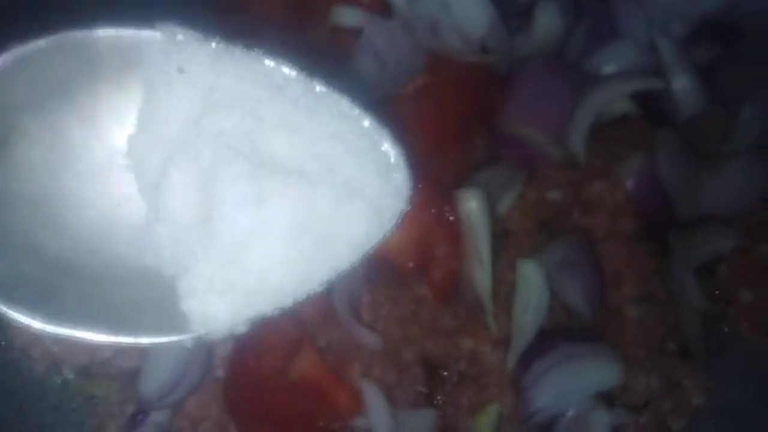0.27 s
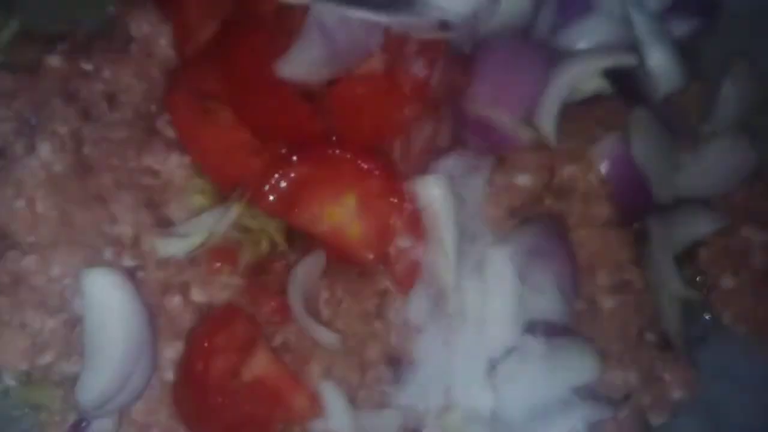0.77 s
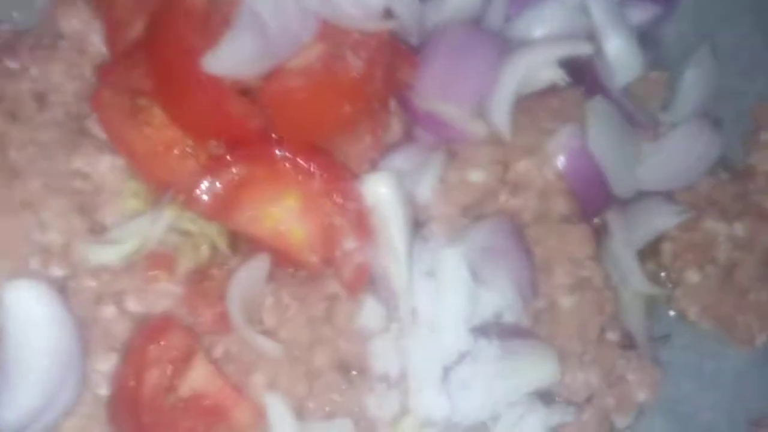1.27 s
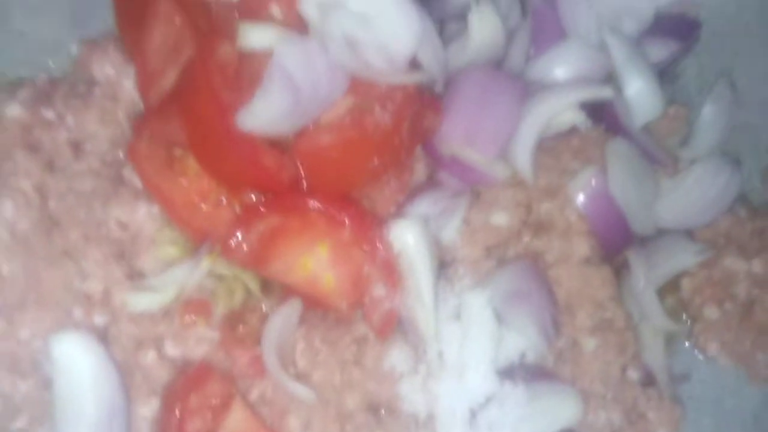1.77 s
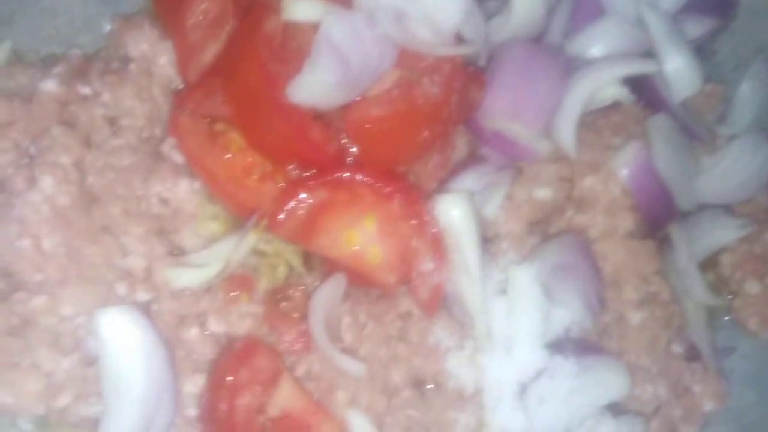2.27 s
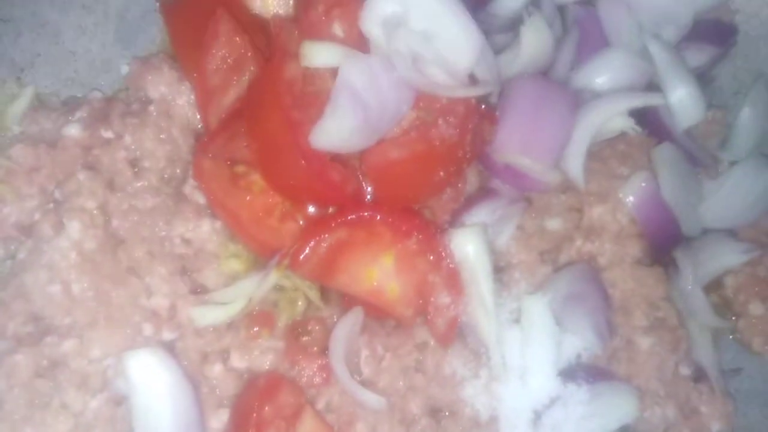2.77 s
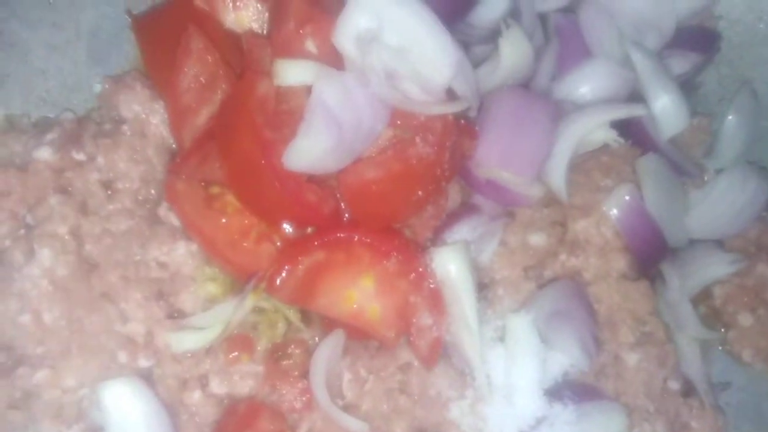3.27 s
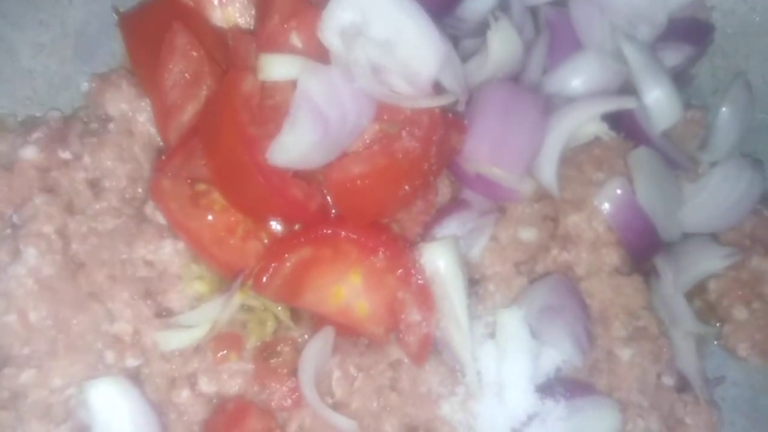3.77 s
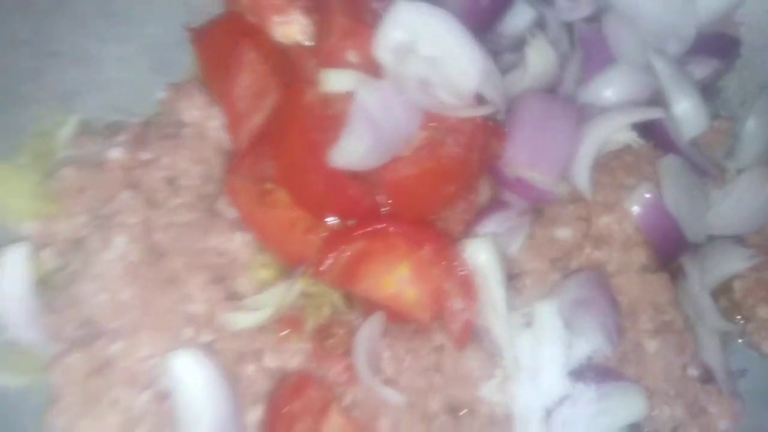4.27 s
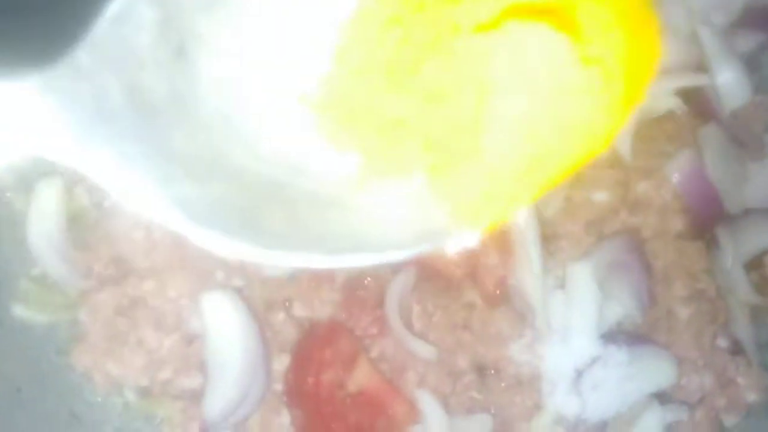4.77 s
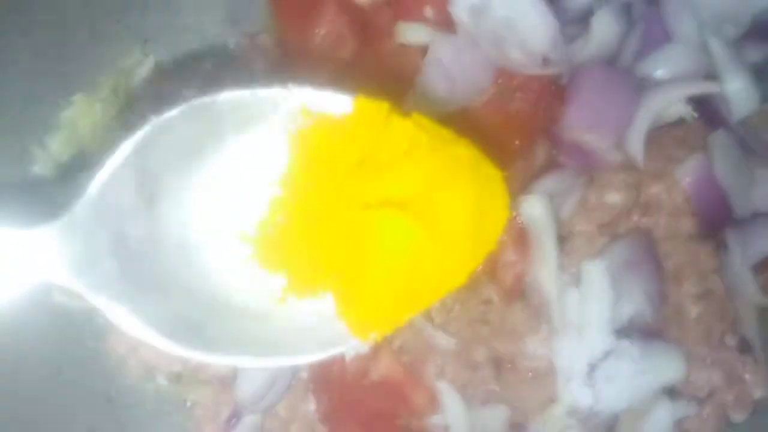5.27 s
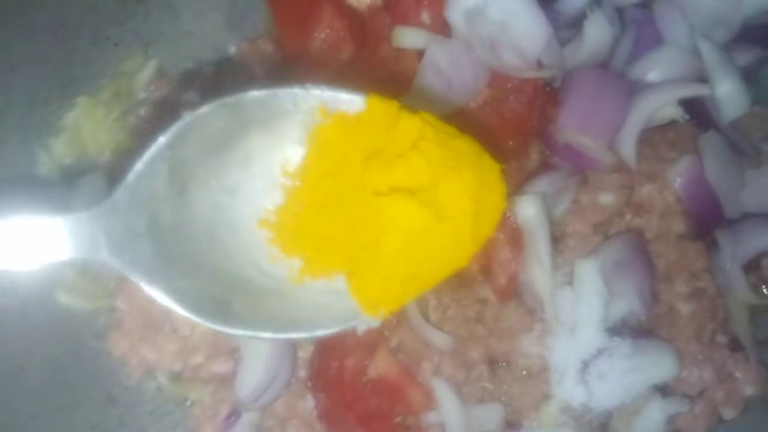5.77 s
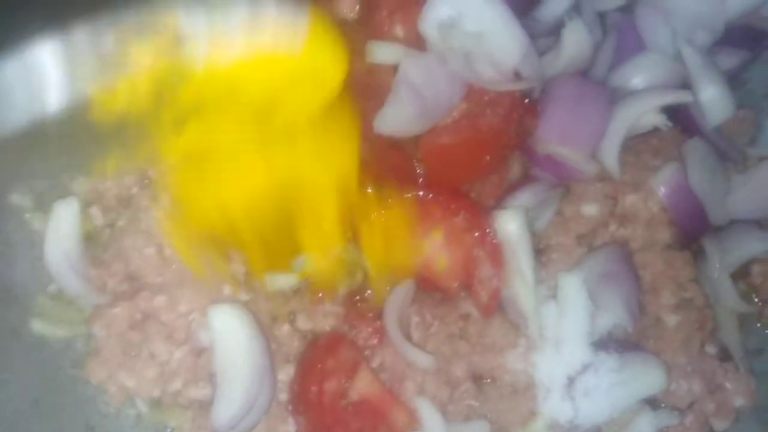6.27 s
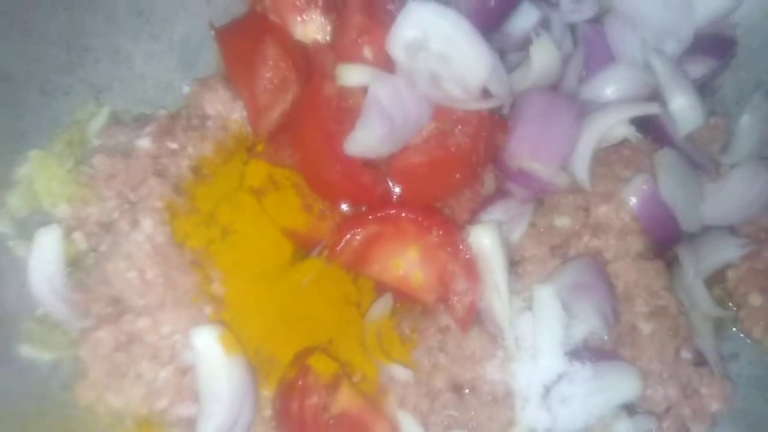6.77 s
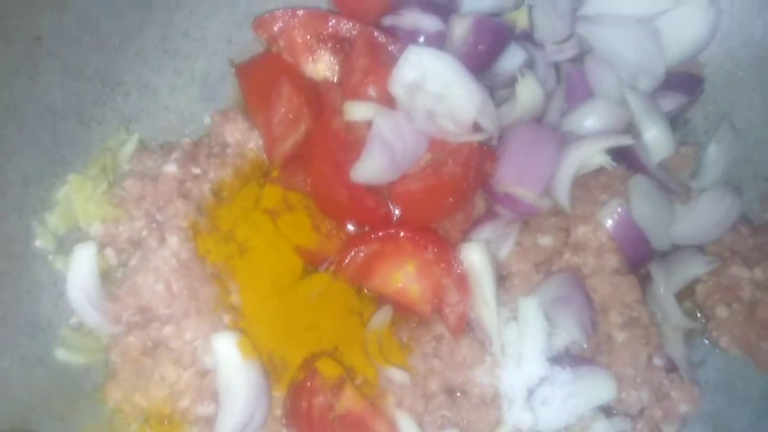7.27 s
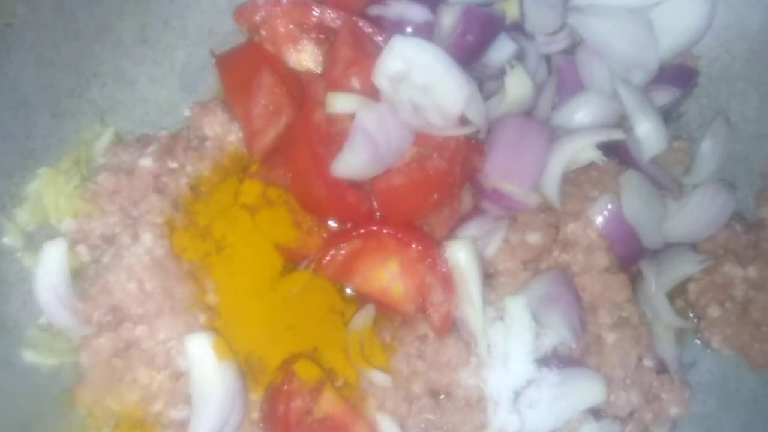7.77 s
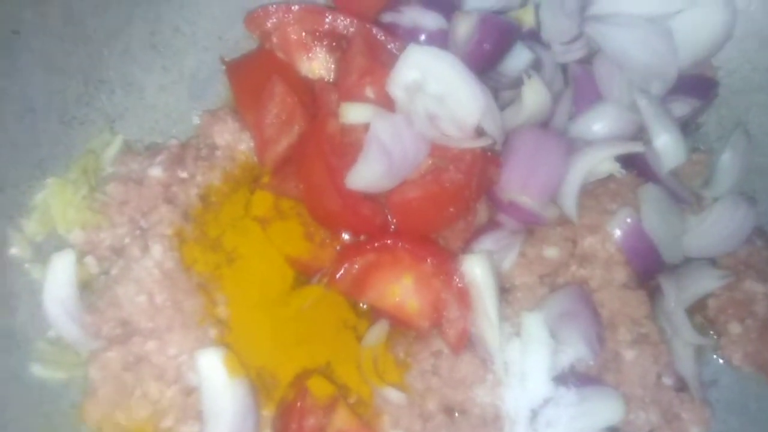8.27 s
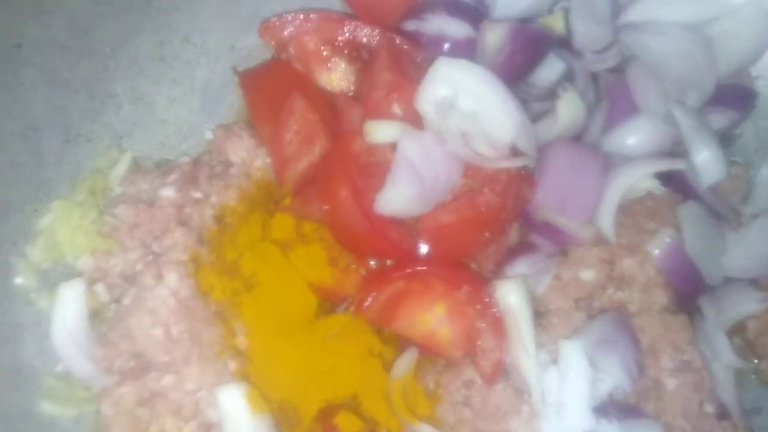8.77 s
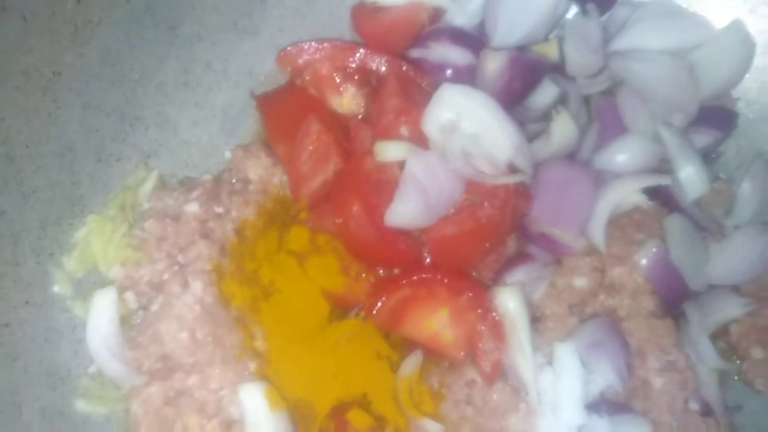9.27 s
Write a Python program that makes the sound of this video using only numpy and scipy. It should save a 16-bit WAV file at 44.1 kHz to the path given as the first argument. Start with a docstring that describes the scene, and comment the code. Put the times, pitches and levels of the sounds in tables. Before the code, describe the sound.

A metal spoon strikes a pot rim: two hard, clattering raps early, then, after scraping through powder in a small container, a slower series of five raps and a barely audible last touch. Each cracks sharply and rings for a fraction of a second. The close stereo microphones lean left and the right is duller. Soft handling rubs, a soft late thump and a thin pulsing whine fill the quiet kitchen.

```python
"""Spoon, salt and cooking pot

A steel spoon tips salt and is knocked on a metal pot's rim, close by in a small kitchen: modes, noise wash and cracks.
Between the two groups of knocks it clinks and scrapes in a hollow container: random slips through resonators.
Shaped noise makes the salt, rubs, jostles and swishes; a filtered pulse late on bumps the left microphone.
Room noise lies on both sides throughout; wavering hiss and a faint throbbing high whine lie mostly on the left.
"""
import sys
import numpy as np
from scipy import signal
from scipy.fft import rfft, irfft
from scipy.io import wavfile

SR = 44100
rng = np.random.default_rng(int(sys.argv[2]) if len(sys.argv) > 2 else 0)


def store_pcm(level_fs):
    """Save levels as 16-bit WAV."""
    pcm = np.round(np.clip(level_fs, -1, 1) * 32767).astype(np.int16)
    wavfile.write(sys.argv[1], SR, np.atleast_2d(pcm).T)


N = 418950
TIME_S = np.arange(N) / SR

# Band widths are standard deviations unless marked -3 dB. Levels come before any echo.
# room noise: f/Hz, relative density/dB
ROOM = [(25, -28), (55, -6), (100, -5), (140, -5.5), (200, -8.5), (280, -6.5), (450, -10), (650, -19),
        (1100, -14), (2000, -24), (3200, -20), (5500, -35.5), (9000, -39), (14000, -38)]
# faint low room drone: f/Hz, width/Hz, rms level/dB
DRONE = [(96, 3, -72.5), (131, 3, -77)]
# hiss bands: f/Hz, width/Hz, rms level before waver/dB
HISS = [(1684, 79, -76), (2206, 79, -65.5), (2542, 51, -65), (2733, 120, -59.5), (2970, 83, -57.5),
        (3298, 71, -57.5), (3890, 110, -70), (4397, 160, -73), (5050, 99, -74), (5296, 140, -75.5),
        (6074, 70, -73.5), (10976, 230, -72)]
# whine bands: f/Hz, width/Hz, rms level before throb/dB
WHINE = [(6810, 18, -61), (6955, 39, -59), (7120, 13, -56.5), (7220, 16, -64.5), (7085, 175, -56)]
THROB_HZ = 10.095

# soft handling rubs: t/s, standard deviation/s, f/Hz, level at the swell's top/dB
RUBS = [(0.142, 0.055, 396, -51), (0.61, 0.033, 335, -61.5), (1.228, 0.081, 265, -50.5),
        (2.986, 0.053, 3500, -51.5), (4.42, 0.062, 292, -63.5), (5.597, 0.062, 1320, -61),
        (5.84, 0.055, 3100, -45.5)]
RUB_WIDTH_RATIO = 0.054  # band width / pitch

# salt grain colour: f/Hz, relative density/dB
SALT = [(2500, -17), (4500, 5), (6500, -15), (9000, -2), (12500, -10), (15000, -18)]
POUR_S, POUR_DB, POUR_RISE_S, POUR_RUN_S, POUR_RELEASE_S = 0.674, -50, 0.047, 0.021, 0.37
SALT_FALL_S = 0.023  # delay from sliding off to landing
LANDING_BELOW_HZ = 5800

# spoon on the rim: t/s, ring level/dB, crack level/dB, bass tint/dB, treble tint/dB
KNOCKS = [(1.5184, -12.5, -1.5, -5.5, 1.5), (1.7006, -10, -1, -3, 2.5), (6.5771, -17, -6, -1.5, -2),
          (6.8119, -14.5, -6, -1.5, -1.5), (7.0566, -14, -6, -3, 2.5), (7.5043, -18, -6.5, -3, -4),
          (7.7573, -12, -2.5, -3, 0.5), (8.03, -35, -21, 3.5, -4)]
# modes of pot and spoon: f/Hz, relative level/dB, t60/s
POT_MODES = [(100, -27, .65), (133, -25, .65), (167, -29, .63), (280, -22, .55), (541, -24, .4),
             (561, -18, .4), (587, -25, .4), (930, -18, .42), (1046, -18, .42), (1069, -17, .42),
             (1094, -15, .44), (1133, -15, .44), (1308, -17, .39), (1365, -17, .38), (1701, -17, .36),
             (1714, -14, .38), (1752, -17, .36), (2119, -14, .34), (2156, -16, .34), (2320, -16, .34),
             (2634, -15, .33), (2750, -14, .33), (2989, -13, .33), (3351, -12, .32), (3775, -14, .31),
             (4233, -11, .31), (4566, -16, .31), (4587, -15, .31), (4894, -13, .3), (5089, -16, .3)]
# wash of dense high modes and kitchen echoes: f/Hz, relative density/dB
WASH = [(29, -51), (50, -20.5), (133, -19.5), (200, -18), (279, -13.5), (460, -11.5), (557, -10),
        (759, -11), (1090, 0.5), (1520, -9.5), (1710, -6.5), (3420, -1.5), (5000, -7), (13600, -47),
        (15000, -63.5)]
# decay of the wash: f/Hz, t60/s
WASH_T60 = [(100, 0.85), (300, 0.54), (700, 0.35), (1500, 0.39), (3500, .32), (7000, 0.32), (13000, 0.48)]
# first crack of contact: f/Hz, relative density/dB
CRACK = [(60, -26.5), (300, -9.5), (600, -9.5), (1200, 6.5), (1800, 1), (3000, 10), (4500, -1),
         (6000, -6.5), (9000, -14.5), (14000, -27)]
# right microphone's level relative to the left: f/Hz, level/dB
RIGHT_SHADE = [(100, -0.5), (1200, -1), (2500, -6), (3500, -7.5), (5000, -12), (7000, -16.5),
               (12000, -12.5)]
KITCHEN_SHARE = 0.74  # power share of the wash that repeats from knock to knock
MODES_DB, MODE_SPREAD_DB = 1, 3

# spoon clinks in the container: t/s, relative peak level/dB
CLINKS = [(2.5145, -18.5), (3.213, -37), (3.407, -23.5), (3.4177, -7.5), (3.5303, -31)]
# damped spoon resonances: f/Hz, -3 dB width of one pass/Hz, relative level/dB
SPOON_MODES = [(488, 66, -6), (886, 58, -16.5), (1330, 76, -16.5), (1870, 220, -13), (2570, 320, -3.5),
               (3244, 360, 7), (3323, 75, 6), (4550, 590, -7), (5380, 250, 4.5), (9470, 210, -22.5),
               (12130, 520, -20.5)]
# blade strokes through powder: t of greatest pressure/s, 60 dB rise/s, level/dB
STROKES = [(2.528, 0.1, -43), (2.582, 0.16, -34.5), (3.35, .5, -33.5), (3.45, .2, -40),
           (3.562, 0.54, -35.5), (3.682, 0.21, -35), (3.724, 0.65, -36.5)]
STROKE_RELEASE_S = 0.24  # 60 dB fall
HOLLOW_DB = -12  # container air relative to the scrape
# container air and wall: (f/Hz, width/Hz, relative level/dB)
CONTAINER_AIR, CONTAINER_WALL = (444, 50, -6.5), (271, 23.7, -0.56)

# container jostled: t/s, 60 dB fall/s, relative level/dB
JOSTLES = [(2.595, .55, -43), (2.71, 0.6, -45.5), (2.984, 0.6, -51)]
JOSTLE_RISE_S = 0.1

# short sliding swishes: t/s, f/Hz, glide/(octaves/s), level at the swell's top/dB
SWISHES = [(4.231, 3960, -19, -46), (4.411, 3810, 9, -52.5)]
SWISH_SPREAD_S = 0.021  # standard deviation of the swell

BUMP_S, BUMP_DB = 9.0905, -7.5  # peak level
CUTOFF_HZ = 14600


def from_db(db):
    """Decibels to gain."""
    return 10 ** (np.asarray(db) / 20)


def rms_one(x):
    """Scale to an rms of 1."""
    return x / np.sqrt(np.mean(x ** 2) + 1e-20)


def at_hz(points, hz):
    """Read a table of (f/Hz, value) on a log-frequency axis."""
    f, value = np.transpose(points)
    return np.interp(np.log(np.maximum(hz, 1)), np.log(f), value)


def bins(size):
    """Frequencies in Hz of a spectrum of `size` samples."""
    return np.arange(size // 2 + 1) * SR / size


def tint(x, spectrum):
    """Filter by a table of (f/Hz, gain/dB)."""
    size = x.shape[-1]
    return irfft(rfft(x) * from_db(at_hz(spectrum, bins(size))), size)


def noise(spectrum, size):
    """Coloured noise of rms 1."""
    return rms_one(tint(rng.standard_normal(size), spectrum))


def noise_bands(bands, size=N):
    """Sum of Gaussian noise bands (f/Hz, width/Hz, rms level/dB)."""
    power = 0
    for hz, width_hz, db in bands:
        bell = np.exp(-.5 * ((bins(size) - hz) / width_hz) ** 2)
        power = power + from_db(db) ** 2 * bell / (width_hz * np.sqrt(2 * np.pi))
    return irfft(rfft(rng.standard_normal(size)) * np.sqrt(power * SR / 2), size)


def drift(rate_hz):
    """Slow random wander, changing about `rate_hz` times a second; rms 1."""
    lowpass = np.exp(-(bins(N) / rate_hz) ** 2)
    return rms_one(irfft(rfft(rng.standard_normal(N)) * lowpass, N))


def resonate(x, modes):
    """Parallel resonances, each applied twice for steep skirts."""
    out = 0
    for hz, width_hz, db in modes:
        r = np.exp(-np.pi * width_hz / SR)
        top = (1 - r * r) / 2
        section = [top, 0, -top, 1, -2 * r * np.cos(2 * np.pi * hz / SR), r * r]
        out = out + from_db(db) * signal.sosfilt([section, section], x + 1e-18)
    return out


def fade(t, t60_s):
    """Decay by 60 dB in t60_s."""
    return np.exp(-np.log(1000) * t / t60_s)


def swell(s, rise_s, release_s, hold_s=0):
    """Gain that rises by 60 dB in rise_s up to time s, holds, then falls by 60 dB in release_s."""
    rise = fade(np.maximum(s - TIME_S, 0), rise_s)
    return rise * fade(np.maximum(TIME_S - s - hold_s, 0), release_s)


def leftish(x, right_db):
    """Two channels, the right one weaker."""
    return np.array([x, x * from_db(right_db)])


def add(out, s, sound):
    """Mix a sound in at time s."""
    start = round(s * SR)
    out[..., start:start + sound.shape[-1]] += sound[..., :N - start]


def kitchen(x, wet_db, t60_s, size=16384):
    """Add a short diffuse tail, different at each microphone."""
    t = TIME_S[:size]
    tails = [rng.standard_normal(size) * fade(t, t60_s) * (t > .004) for side in range(2)]
    echoes = [signal.fftconvolve(side, tail / np.linalg.norm(tail))[:N] for side, tail in zip(x, tails)]
    return x + from_db(wet_db) * np.array(echoes)


def background(room_db, throb_db, throb_lead_rad, waver_db):
    """Partly shared room noise and drone; wavering hiss and a whine that swells ten times a second, left."""
    separate = np.array([noise(ROOM, N), noise(ROOM, N)])
    room = from_db(room_db) * (noise(ROOM, N) + 0.83 * separate) + noise_bands(DRONE)
    hiss = sum(noise_bands([band]) * from_db(waver_db * drift(8.1)) for band in HISS)
    throb = from_db(throb_db * np.cos(2 * np.pi * THROB_HZ * TIME_S + throb_lead_rad))
    whine = noise_bands(WHINE) * throb
    return room + leftish(hiss, right_db=-31.5) + leftish(whine, right_db=-18.5)


def rubbing():
    """Handling stirs brief swells of noise, each around one pitch."""
    out, size = np.zeros((2, N)), 32768
    for s, spread_s, hz, db in RUBS:
        start_s = max(s - size / SR / 2, 0)
        bell = np.exp(-.5 * ((TIME_S[:size] + start_s - s) / spread_s) ** 2)
        rub = noise_bands([(hz, RUB_WIDTH_RATIO * hz, db)], size) * bell
        add(out, start_s, leftish(rub, right_db=at_hz(RIGHT_SHADE, hz) - 4.5))
    return out


def salt():
    """Fine grains slide off the spoon with a bright hiss and land with a duller one."""
    grains = noise(SALT, N)
    landing = irfft(rfft(grains) * (bins(N) < LANDING_BELOW_HZ), N)
    sliding = grains - landing
    flow_off = swell(POUR_S, POUR_RISE_S, POUR_RELEASE_S, POUR_RUN_S)
    flow_down = swell(POUR_S + SALT_FALL_S, POUR_RISE_S, POUR_RELEASE_S, POUR_RUN_S)
    return leftish(from_db(POUR_DB) * (sliding * flow_off + landing * flow_down), right_db=-16)


def pot_noise(spectrum, size, likeness):
    """Noise with correlation `likeness` between the microphones, duller on the right."""
    left, other = noise(spectrum, size), noise(spectrum, size)
    right = likeness * left + np.sqrt(1 - likeness ** 2) * other
    return np.array([left, tint(right, RIGHT_SHADE)])


def wash(t, steady):
    """Countless modes and wall echoes blur into noise that decays at a rate set by frequency."""
    spectrum, out = rfft(steady), 0
    for k, (hz, t60_s) in enumerate(WASH_T60):
        # overlapping bands that sum to 1
        share = at_hz([(row[0], j == k) for j, row in enumerate(WASH_T60)], bins(len(t)))
        out = out + irfft(spectrum * share, len(t)) * fade(t, t60_s)
    return out


def pot_ring(t, colour, spread_db):
    """Each knock lands on another spot and so shares its force anew among the modes."""
    out = 0
    for hz, db, t60_s in POT_MODES:
        strength = from_db(db + at_hz(colour, hz) + spread_db * rng.standard_normal())
        sides = from_db([[0], [at_hz(RIGHT_SHADE, hz)]])
        # long waves reach both microphones nearly in step
        turns = rng.random() + min(hz / 1200, 1) * rng.random((2, 1))
        out = out + strength * sides * np.sin(2 * np.pi * (hz * t + turns)) * fade(t, t60_s)
    return out


def knocks(crack_s, wash_db, heavy_db, size=32768):
    """Steel on steel: a hard crack rattles for a few milliseconds while pot and kitchen ring."""
    out, t = np.zeros((2, N)), TIME_S[:size]
    attack = 1 - np.exp(-t / 0.0001)
    burst = 1 / (1 + (t / crack_s) ** 8)
    same = pot_noise(WASH, size, likeness=0.11)
    for s, ring_db, crack_db, bass_db, treble_db in KNOCKS:
        thud_db = min(ring_db - heavy_db, 0)  # a light touch does not shake the whole pot
        colour = [(200, bass_db + thud_db), (550, bass_db), (1200, bass_db), (2500, 0.0037), (5000, treble_db)]
        fresh = pot_noise(WASH, size, likeness=0.12)
        echoes = np.sqrt(KITCHEN_SHARE) * same + np.sqrt(1 - KITCHEN_SHARE) * fresh
        ring = from_db(wash_db) * wash(t, tint(echoes, colour))
        ring = ring + from_db(MODES_DB) * pot_ring(t, colour, MODE_SPREAD_DB)
        crack = tint(pot_noise(CRACK, size, likeness=0.22), colour) * burst
        add(out, s, attack * (from_db(ring_db) * ring + from_db(crack_db) * crack))
    return out


def scooping(slips_per_s, spread_db, clink_db, judder_db, right_db):
    """Tiny slips and a few clinks on the container's wall excite the spoon, which the powder damps."""
    slips = (rng.random(N) < slips_per_s / SR) * rng.choice([-1, 1], N)
    slips = slips * from_db(spread_db * rng.standard_normal(N))
    grip_db = judder_db * drift(47)  # the blade sticks and slides
    strokes = [from_db(db) * swell(s, rise_s, STROKE_RELEASE_S) for s, rise_s, db in STROKES]
    pressure = np.sqrt(sum(stroke ** 2 for stroke in strokes))
    scrape = 0
    for mode in SPOON_MODES:
        # the contact point wanders, so the resonances take turns
        turn_db = MODE_SPREAD_DB * drift(25)
        scrape = scrape + resonate(slips * from_db(grip_db + turn_db), [mode])
    scrape = (rms_one(scrape) + from_db(HOLLOW_DB) * noise_bands([CONTAINER_AIR])) * pressure
    clink = resonate(signal.unit_impulse(4096), SPOON_MODES)
    for s, db in CLINKS:
        add(scrape, s, from_db(db + clink_db) * clink / np.abs(clink).max())
    right = from_db(right_db) * tint(scrape, RIGHT_SHADE)
    return kitchen(np.array([scrape, right]), wet_db=-3.5, t60_s=0.35)


def jostling(right_db):
    """The container shifts in the hand with a low, hollow rumble of its wall and air."""
    motion = sum(from_db(db) * swell(s, JOSTLE_RISE_S, release_s) for s, release_s, db in JOSTLES)
    return leftish(noise_bands([CONTAINER_AIR, CONTAINER_WALL]) * motion, right_db)


def swish(width_hz):
    """Something slides briefly: a narrow noise band glides in pitch as it swells and fades."""
    out, t = np.zeros(N), np.arange(-.06, .06, 1 / SR)
    for s, hz, glide, db in SWISHES:
        turns = np.cumsum(hz * 2 ** (glide * t)) / SR
        band = np.sqrt(2) * drift(width_hz)[:len(t)] * np.sin(2 * np.pi * turns)
        add(out, s + t[0], from_db(db) * band * np.exp(-.5 * (t / SWISH_SPREAD_S) ** 2))
    return kitchen(leftish(out, right_db=-22), wet_db=1.5, t60_s=0.41)


def bump(low_hz, high_hz):
    """One soft, dull pulse right at the left microphone: a band-passed, low-passed impulse."""
    band = signal.butter(2, [low_hz, high_hz], "band", fs=SR, output="sos")
    pulse = signal.sosfilt(band, signal.unit_impulse(4096))
    pulse = signal.sosfilt(signal.butter(4, 1400, fs=SR, output="sos"), pulse)
    out = np.zeros(N)
    add(out, BUMP_S, -from_db(BUMP_DB) * pulse / np.abs(pulse).max())
    return kitchen(leftish(out, right_db=-48), wet_db=-15.0, t60_s=0.45)


def scene():
    """Knocks on the pot, the quieter work around them and the background."""
    pot = knocks(crack_s=0.0051, wash_db=2.5, heavy_db=-13)
    spoon = scooping(slips_per_s=1500, spread_db=4, clink_db=3.0, judder_db=3.5, right_db=-4.0)
    handling = jostling(right_db=-3) + rubbing() + swish(width_hz=620) + bump(low_hz=292, high_hz=986)
    bed = background(room_db=-71.0, throb_db=4.5, throb_lead_rad=0.34, waver_db=3.5)
    return pot + spoon + salt() + handling + bed


def record(dry):
    """The loudest cracks saturate; the deepest bass and the top are cut."""
    clipped = dry / (1 + dry ** 6) ** (1 / 6)
    lean = signal.sosfilt(signal.butter(2, 45, "high", fs=SR, output="sos"), clipped)
    return signal.sosfilt(signal.ellip(10, .1, 80, CUTOFF_HZ, fs=SR, output="sos"), lean)


dry = scene()
out = record(dry)
store_pcm(out)
```